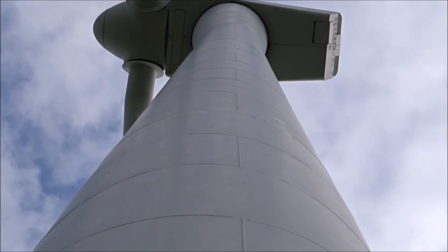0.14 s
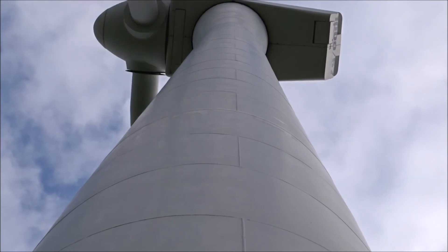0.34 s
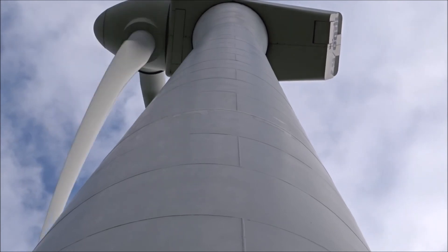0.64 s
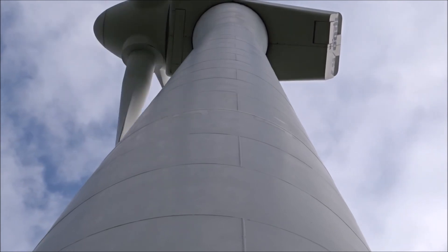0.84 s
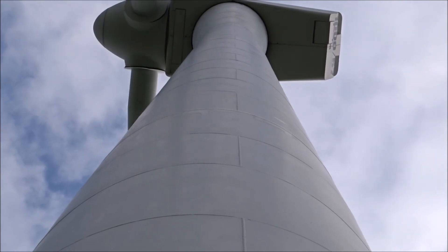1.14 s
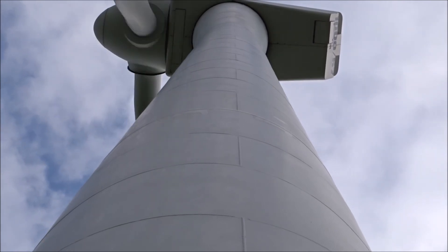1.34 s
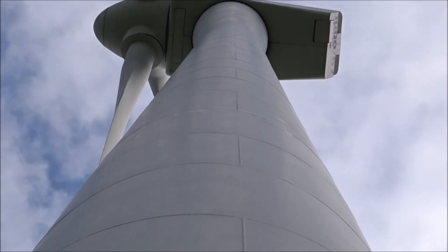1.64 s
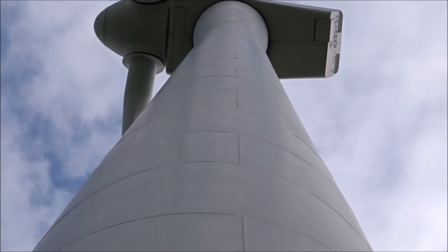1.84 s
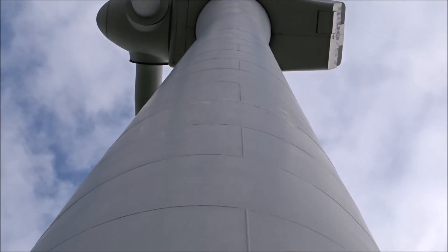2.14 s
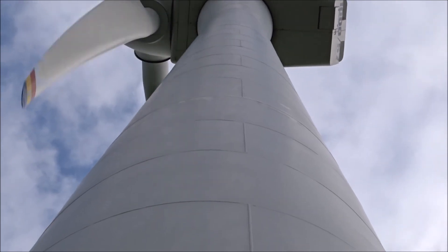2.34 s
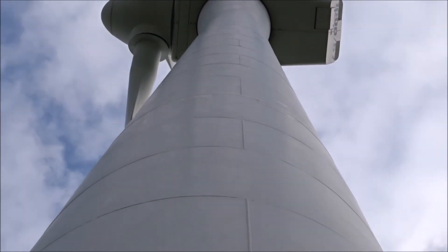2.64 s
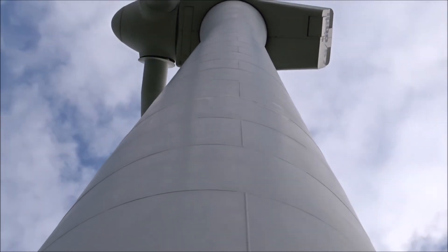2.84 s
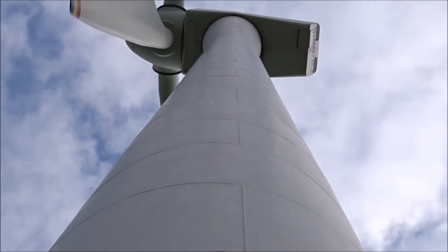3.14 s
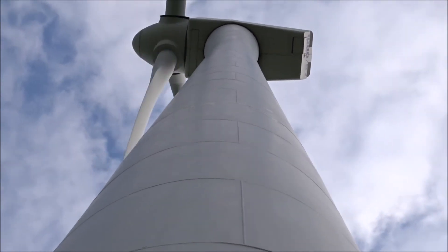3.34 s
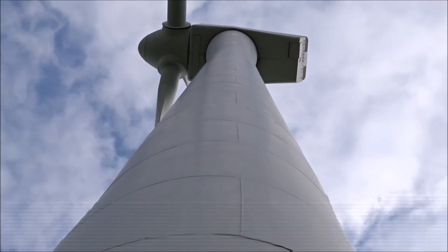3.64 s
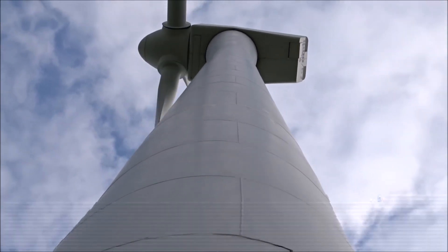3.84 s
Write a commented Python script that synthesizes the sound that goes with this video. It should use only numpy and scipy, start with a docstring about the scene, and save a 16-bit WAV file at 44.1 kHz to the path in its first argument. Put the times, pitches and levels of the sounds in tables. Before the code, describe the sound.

Strong wind slams into the exposed stereo microphones of a handheld camera at the foot of a wind turbine, with low rumble, flutter and crackle; it drops to a lull, puffs again and cuts off.

```python
"""Strong gusty wind buffets the two microphone ports of a camera held at the foot of a wind turbine.
Turbulent noise in octave bands swells, slams, flutters and stalls; strong gusts turn brighter.
The timing between the ports changes during a lull. Opposed hollow roars and overload crackle join the wind,
the camera body ticks a few times in the hand as short noise bursts, and a faint noise hiss lies below.
Wind and hiss are switched off abruptly near the end."""
import sys
import numpy as np
from scipy import signal
from scipy.fft import rfft, irfft
from scipy.io import wavfile
from scipy.ndimage import uniform_filter1d, minimum_filter1d

SR = 44100
rng = np.random.default_rng(int(sys.argv[2]) if len(sys.argv) > 2 else 0)


def to_wav(sig):
    """Store sig (one row per channel, or 1-D mono) as 16-bit WAV at the path in sys.argv[1].

    Samples outside -1..1 are clipped; the rate is SR.
    """
    pcm = np.clip(np.atleast_2d(sig), -1, 1) * 32767
    pcm = np.round(pcm).astype(np.int16)
    wavfile.write(sys.argv[1], SR, pcm.T)  # frames by channels


N = 176400
LEFT_RIGHT = np.array([[1], [-1]])  # opposite signs for the two channels

# gusts, before each band's share: [t/s, buffeting level/dB, treble level/dB]
GUSTS = [(0.0, -4, -1), (0.19, 4, 4), (0.3, 3, -1.5), (0.38, -2, 2), (0.47, -1.5, -5.5), (0.55, -2, -2.5),
         (0.66, 2.5, 1.5), (0.9, 0.5, -2), (1.05, 6.5, 1), (1.17, 1, -0.5), (1.29, 2, 1.5),
         (1.325, -3.5, -7), (1.56, -8.5, -12), (1.63, -4.5, -6.5), (1.8, 3.5, -2.5), (1.97, -3.5, 0.5),
         (2.12, 0, 0), (2.21, -9, -3), (2.42, -7.5, -5), (2.56, -6.5, -3), (2.65, -10, -7.5),
         (2.73, -11.5, -7.5), (2.81, -13.5, -19), (2.9, -15.5, -19), (3.021, -21, -26.5),
         (3.062, -9.5, -7.5), (3.18, -1, -5), (3.25, -12.5, -14.5), (3.34, -12, -14.5), (3.401, -2.5, -4),
         (3.48, -8.5, -9.5), (3.54, -7, -3.5)]


def undb(db):
    """Decibels to gain."""
    return 10 ** (np.asarray(db) / 20)


def at_hz(hz, table, axis=1):
    """One column of a table read on a log-frequency axis."""
    table = np.array(table, float)
    return np.interp(np.log(np.maximum(hz, 1)), np.log(table[:, 0]), table[:, axis])


def noise_spectrum(table):
    """Random spectrum of a noise with this colour and rms 1."""
    gain = undb(at_hz(np.fft.rfftfreq(N, 1 / SR), table))
    return rfft(rng.standard_normal(N)) * gain / np.sqrt(np.mean(gain ** 2))


def noise(table):
    """Coloured noise, rms 1."""
    return irfft(noise_spectrum(table), N)


def walk(hz):
    """Random levels held 1 / hz s and slewed twice; spread near 1."""
    hold = max(int(SR / hz), 2)
    levels = rng.standard_normal(N // 20)[:N // hold + 1]
    steps = np.repeat(levels, hold)
    return np.sqrt(2) * uniform_filter1d(uniform_filter1d(steps, hold), hold)[:N]


def wind(t):
    """Turbulence at the ports in octave bands: gusts swell and stall, eddies slam and flutter, the treble tears."""
    wind_db = -12.5  # base level, moved by the gusts
    rumble_hz, buffet_hz, treble_hz, edge_hz = 70.4, 224, 1750, 3900
    rumble_share, edge_share = 0.34, 2.1  # how far the deepest rumble and the top edge follow the gusts
    flutter_db, flutter_hz = 0.68, 95.1  # shared by all bands
    lull_flutter = .07  # extra dB of flutter per dB that the gust drops: lulls break up into puffs
    tear_db, tear_hz = 1.5, 262.9  # fast tearing of the treble
    flicker_hz = 41.91
    # each band also throbs alone, deepest in the bass: [f/Hz, depth/dB]
    flicker_depth = [(60, 2), (280, 1.45), (1000, 0.58)]
    turn_s, turn_length_s, turn_pan_db = 2.87, 0.55, 2.5  # after the turn the balance leans left

    f = np.fft.rfftfreq(N, 1 / SR)
    before, after = (irfft(spectra, N) for spectra in port_pressures(f))
    turned = np.clip((t - turn_s) / turn_length_s + .5, 0, 1)
    after = after * undb(LEFT_RIGHT * turn_pan_db / 2)
    pressure = rfft(np.sqrt(1 - turned) * before + np.sqrt(turned) * after)

    times, buffet_db, treble_db = np.array(GUSTS).T
    buffet = np.interp(t, times, buffet_db)
    treble = np.interp(t, times, treble_db)
    flutter = (flutter_db + lull_flutter * np.maximum(-buffet, 0)) * walk(flutter_hz)
    tear = tear_db * walk(tear_hz)

    centres = 40 * 2. ** np.arange(9)
    octave = np.log2(np.clip(f, centres[0], centres[-1]))
    out = 0
    for hz in centres:
        overlap = np.maximum(1 - abs(octave - np.log2(hz)), 0)  # triangular bands that sum to 1
        band = irfft(pressure * overlap, N)
        high = at_hz(hz, [(buffet_hz, 0), (treble_hz, 1)])
        follows = at_hz(hz, [(rumble_hz, rumble_share), (buffet_hz, 1), (treble_hz, 1), (edge_hz, edge_share)])
        gust = (1 - high) * buffet + high * (treble + tear)
        flicker = at_hz(hz, flicker_depth) * walk(flicker_hz)
        db = follows * gust + flutter + flicker
        out = out + band * undb(db + slam_db(t, hz) + stall_db(t, hz))
    return undb(wind_db) * close_ports(out)


def port_pressures(f):
    """Spectra of the turbulence at both ports before and after the turn: shared eddies, phase-shifted, plus own."""
    # colour of the wind pressure at the ports: [f/Hz, relative level/dB per Hz]
    pressure_colour = [(11, -64.5), (30, -47), (60, -44.5), (97, -40.5), (110, -41), (128, -39), (190, -37),
                       (330, -38), (550, -45.5), (900, -51.5), (1600, -61.5), (2500, -67), (4000, -82.5),
                       (7000, -104.1), (16000, -127.1)]
    # how the ports differ:
    # [f/Hz, likeness 0-1, left minus right/dB, left lead before the turn/rad, left lead after it/rad]
    port_contrast = [(35, 0.9, 2, .05, 0.7), (68, 0.7, 5.5, .4, 1.1), (94, 0.91, 5, 0.65, 0.9),
                     (168, 0.67, 2, 1.62, 1.1), (305, 0.79, -5, 2.2, -2.5), (490, 0.69, -1.3, 2.42, -2.5),
                     (912, 0.81, -0.6, 3.23, -2.5), (2140, 0.46, -2.3, 3.53, -3.5),
                     (3040, 0, -1.5, 4.26, 4.5), (5500, 0.7, -0.5, 7.3, -7)]

    shared, left, right = (noise_spectrum(pressure_colour) for _ in range(3))
    alike = np.clip(at_hz(f, port_contrast, axis=1), 0, 1)
    balance = undb(LEFT_RIGHT * at_hz(f, port_contrast, axis=2) / 2)
    balance = balance / np.sqrt(np.mean(balance ** 2, axis=0))
    own = np.sqrt(1 - alike) * np.array([left, right])
    lead_before = at_hz(f, port_contrast, axis=3)
    lead_after = at_hz(f, port_contrast, axis=4)
    sides = []
    for eddies, lead in ((shared, lead_before), (noise_spectrum(pressure_colour), lead_after)):
        shifted = eddies * np.exp(.5j * LEFT_RIGHT * lead)
        sides.append(balance * (own + np.sqrt(alike) * shifted))
    return sides


def slam_db(t, hz):
    """Boost that the single eddies slamming into the ports give to the band around hz."""
    # single eddies: [t/s, time from peak to half boost/s, boost/dB, centre f/Hz, spread/octaves]
    slams = [ (.09, 0.044, 11, 90, 0.49), (0.257, 0.099, 3.5, 80, 0.25), (0.367, 0.0072, 4.5, 2000, 1.8),
             (.435, .008, 8, 1500, 3), (0.541, 0.004, 6, 700, 2.4), (.939, 0.005, 4, 900, 1.6),
             (0.56, 0.034, 8, 50, 0.76), (0.602, 0.027, 4.5, 111, 0.6), (1.225, 0.015, 7.5, 3460, 0.63),
             (1.408, 0.007, 11, 1200, 1.6), (1.457, 0.013, 6, 600, 2), (1.554, 0.0066, 7.5, 2000, 1.4),
             (1.618, 0.014, 6.5, 3000, 1.8), (1.78, .04, 7, 50, 0.594), (1.948, 0.15, 4.5, 44.8, 0.59),
             (2.84, .06, 4.5, 95, .5), (3.408, .03, 3.5, 170.4, .7), (1.778, .004, 6, 700, 2),
             (1.819, .003, 8, 1500, 3), (1.265, .025, -1, 2200, 0.97), (1.96, 0.05, 3.5, 1120, 0.6),
             (2.087, 0.018, 8.5, 70, 1.2), (2.021, .014, 10.5, 2400, 1.7), (2.288, .008, 4, 1500, 1.5),
             (2.773, .004, 8, 1500, 2), (2.895, .005, 5.5, 1500, 1.5), (2.951, .004, 7, 700, 1.5),
             (3.047, .004, 7, 1200, 2), (3.249, .004, 6, 800, 2), (3.385, .003, 7, 2000, 1.2),
             (3.482, .004, 8, 2200, .8), ]
    db = 0
    for when, length, boost_db, centre_hz, spread in slams:
        reach = np.exp(-(np.log2(hz / centre_hz) / spread) ** 2 / 2)
        swell = np.maximum(1 - ((t - when) / length) ** 2 / 2, 0)
        db = db + boost_db * reach * swell
    return db


def stall_db(t, hz):
    """Brief drop around hz whenever the flow lets go of the ports for an instant."""
    # stalls, before their reach: [t/s, Gaussian half length/s, depth/dB]
    stalls = [(0.395, .01, 11.5), (0.46, .014, 6.5), (1.39, 0.013, 5), (1.582, 0.0064, 6),
              (2.05, 0.015, 5.5), (2.25, 0.011, 5), (2.604, 0.011, 6), (2.853, 0.0085, 8)]
    # the rumble carries on: [f/Hz, share of the depth]
    stall_reach = [(60, 0.059), (150, 0.43), (400, 0.73)]
    depth = sum(db * np.exp(-((t - when) / length) ** 2 / 2) for when, length, db in stalls)
    return -at_hz(hz, stall_reach) * depth


def close_ports(x):
    """Narrows the deepest rumble: the ports sit close, so the longest waves press on both alike."""
    # [f/Hz, gain of the side signal/dB]
    side_bass = [(30, -7.5), (48, -7.5), (68, 0)]
    mid, side = (x[0] + x[1]) / 2, (x[0] - x[1]) / 2
    gain = undb(at_hz(np.fft.rfftfreq(N, 1 / SR), side_bass))
    side = irfft(rfft(side) * gain, N)
    return np.array([mid + side, mid - side])


def roar(t):
    """Hollow swells and bumps as air skims across the ports, pushing one while it pulls the other."""
    # broad resonances: [t/s, Gaussian half length/s, level/dB, centre f/Hz]
    roars = [ (0.2, .07, -21, 490), (0.67, .05, -20.5, 790), (2.4, 0.08, -21.5, 480),
             (2.39, 0.11, -21, 620), (2.088, .0035, -2, 410), ]
    width_oct = 0.38
    f = np.maximum(np.fft.rfftfreq(N, 1 / SR), 1)
    air = rfft(rng.standard_normal(N))
    out = 0
    for when, length, db, hz in roars:
        resonance = 1 / (1 + (np.log2(f / hz) / width_oct) ** 2 / 2) ** 2
        hollow = irfft(air * resonance, N)
        swell = np.exp(-((t - when) / length) ** 2 / 2)
        out = out + hollow / np.std(hollow) * undb(db) * swell
    return out * LEFT_RIGHT


def crackle(t):
    """Fine crackle of the microphones overloading: uneven random pops that grow with the treble of the gusts."""
    # colour of the pops: [f/Hz, relative level/dB per Hz]
    crackle_colour = [(800, -5.5), (2500, 5), (4300, -2), (6200, -19), (8000, -10), (10500, -21),
                      (12000, -29), (16000, -31.5)]
    crackle_db, pops_per_s, scatter_db = -54.5, 450, 11  # base level, mean rate, scatter of the pop sizes
    times, _, treble_db = np.array(GUSTS).T
    happens = rng.random(N) < pops_per_s / SR
    sign = rng.choice([-1, 1], N)
    size = undb(scatter_db * np.minimum(rng.exponential(size=N), 4))
    pan = rng.uniform(-.5, 0.37, N)  # positive is left
    pops = happens * sign * size * np.array([1 + pan, 1 - pan])
    colour = undb(at_hz(np.fft.rfftfreq(N, 1 / SR), crackle_colour))
    pops = irfft(rfft(pops) * colour, N)
    db = crackle_db + np.interp(t, times, treble_db) + slam_db(t, hz=3000) + stall_db(t, hz=3000)
    return pops / np.std(pops) * undb(db)


def ticks(t, side=0.49):
    """Very short plastic ticks of the camera body: decaying noise bursts with a bright ring."""
    # handling ticks: [t/s, level/dB, decay/s, level of the ring before the tick level/dB]
    tick_list = [(2.3727, -40, 0.0014, -18), (3.3838, -29.5, 0.0021, 0), (3.549, -39, .0008, -4.5),
                 (3.556, -48, 0.0011, -6)]
    # colours of body and ring: [f/Hz, relative level/dB per Hz]
    body_colour = [(1000, -11.5), (2200, 4), (4500, 5.5), (6400, 7.5), (8000, 3), (10000, 2.5),
                   (16000, -12.5)]
    ring_colour = [(1000, -55), (10000, -22), (11800, -6), (12900, -9), (13900, -2), (15000, -14),
                   (16500, -11)]
    attack_s = 0.00053
    body, ring = (noise(c) + side * LEFT_RIGHT * noise(c) for c in (body_colour, ring_colour))
    out = 0
    for when, db, decay, ring_db in tick_list:
        age = np.maximum(t - when, 0)
        rise = np.minimum(age / attack_s, 1)
        shape = rise * np.exp(-np.maximum(age - attack_s, 0) / decay)
        out = out + undb(db) * shape * (body + undb(ring_db) * ring)
    return out


def hiss(t):
    """Faint even noise, much alike on both sides."""
    # colour: [f/Hz, relative level/dB per Hz]
    hiss_colour = [(300, 0.5), (2000, 0), (4500, -8.5), (7000, -9.5), (10000, -10.5), (11500, -16),
                   (14000, -23), (16000, -30.5)]
    # drift of the level, which comes up late on: [t/s, level/dB]
    hiss_drift = [(0, 1.5), (1.45, 0), (1.8, -1), (2.6, -2), (2.95, 0), (3.25, 2.5), (3.55, 2.5)]
    hiss_db, side_share = -55.5, 0.37  # base level, gain of the side noise
    db = hiss_db + np.interp(t, *np.array(hiss_drift).T)
    return undb(db) * (noise(hiss_colour) + side_share * LEFT_RIGHT * noise(hiss_colour))


def gain_control(x, size=400):
    """Turns both channels down while their peaks pass the threshold, which evens out the strongest gusts."""
    threshold_db, ratio, reaction_s = -7.5, 1.5, 0.00325
    peak = -minimum_filter1d(-abs(x).max(axis=0), size)  # highest peak within size samples
    keep = np.exp(-1 / (reaction_s * SR))
    held = signal.lfilter([1 - keep], [1, -keep], peak)
    return x * np.maximum(held / undb(threshold_db), 1) ** (1 / ratio - 1)


def scene():
    """Wind, roar, crackle and hiss up to the switch-off, after which the level drops and a faint tail dies away
    quickly, and the ticks."""
    off_s, off_fade_s = 3.548, 0.0028
    fade_end_db, fade_end_decay_s = -9, 0.0071  # level and decay of the faint tail after the drop
    t = np.arange(N) / SR
    since_off = np.maximum(t - off_s, 0)
    off = np.minimum(since_off / off_fade_s, 1)
    fade_end = undb(fade_end_db) * np.exp(-since_off / fade_end_decay_s)
    on = 1 - off + off * fade_end
    return on * (wind(t) + roar(t) + crackle(t) + hiss(t)) + ticks(t)


def record(dry):
    """The camera holds down the strongest gusts, rounds off the peaks and cuts the top."""
    ceiling, top_hz = 1.5, 15800  # overload level with full scale 1, edge of the low-pass
    held = gain_control(dry)
    rounded = held / (1 + (held / ceiling) ** 4) ** (1 / 4)
    low_pass = signal.ellip(8, .2, 70, top_hz, fs=SR, output="sos")
    return signal.sosfilt(low_pass, rounded)


dry = scene()
out = record(dry)
to_wav(out)
```